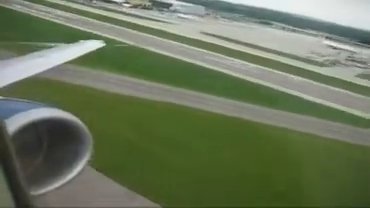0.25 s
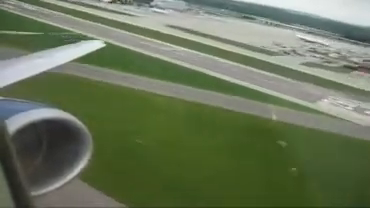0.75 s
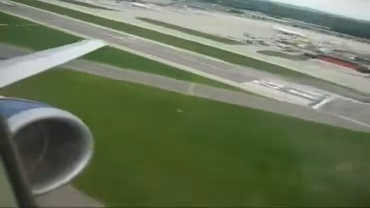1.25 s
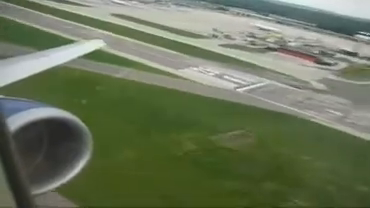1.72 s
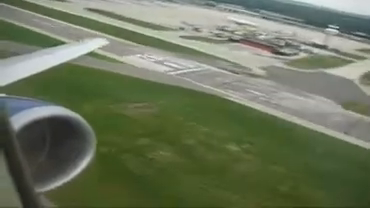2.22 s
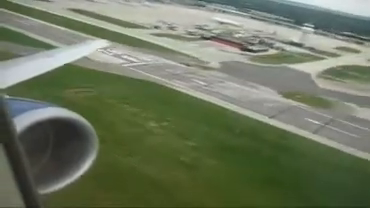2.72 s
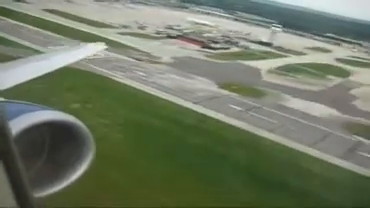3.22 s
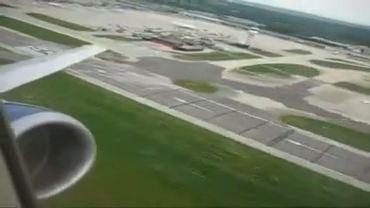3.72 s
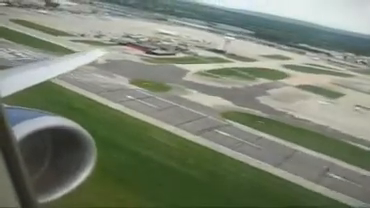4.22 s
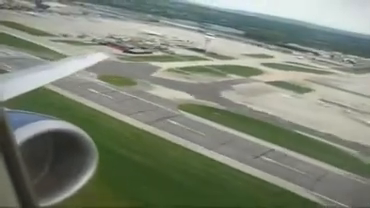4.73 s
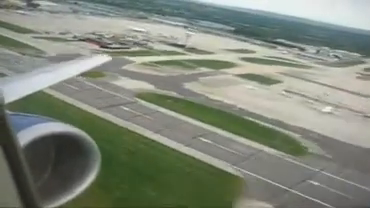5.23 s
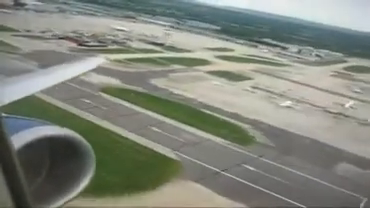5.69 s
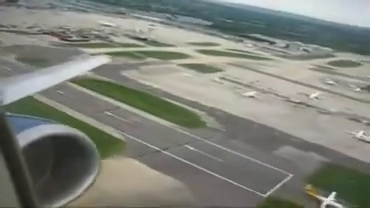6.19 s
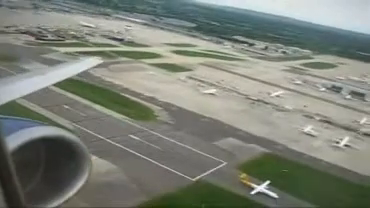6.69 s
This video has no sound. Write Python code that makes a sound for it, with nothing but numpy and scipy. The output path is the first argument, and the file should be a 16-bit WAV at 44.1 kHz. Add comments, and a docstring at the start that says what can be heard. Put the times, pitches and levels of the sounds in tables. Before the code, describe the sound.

From the first moment to the end at about 7 seconds, a jet engine runs at takeoff power, heard inside an airliner cabin through one microphone at the window. A deep exhaust roar is the loudest part, with an uneven boom and rumble from the cabin walls beneath it. Over this, the nearby fan makes a raspy buzz-saw drone that holds its pitch while its overtones slowly swell and fade, one middle tone standing out most around 4.5 seconds. A very faint, thin, high whine stays behind it. Air rushes along the outside of the cabin, with a light hiss that grows slightly. Small gusts lift the buzz, roar and rush together at about 0.7, 2.7, 3.3 and 4.8 seconds and again at the very end. The overall level stays nearly even, and the treble is slightly gritty.

```python
"""Airliner cabin, window seat just ahead of the engine, climbing out at takeoff power.
Close by, the fan's supersonic blade tips give a buzz-saw chord on multiples of the shaft speed, over
a thin core whine. The jet exhaust makes the cabin boom and roar; air rushes along the skin outside.
One microphone at the window, on a pocket camera whose coarse sampling mirrors the buzz into the treble."""
import sys
import numpy as np
from scipy import signal
from scipy.fft import rfft, irfft, next_fast_len
from scipy.io import wavfile
from scipy.ndimage import uniform_filter1d

SR = 44100
rng = np.random.default_rng(int(sys.argv[2]) if len(sys.argv) > 2 else 0)


def store_pcm(level_fs):
    """Save levels as 16-bit WAV."""
    pcm = np.round(np.clip(level_fs, -1, 1) * 32767).astype(np.int16)
    wavfile.write(sys.argv[1], SR, np.atleast_2d(pcm).T)


N = 306495

# gusts in the air that meets the aircraft: t/s, strength/dB
GUST_STRENGTH = [(0.0, -1.0), (0.2, -2.5), (0.7, 2), (1.6, 0), (1.8, 0), (2.0, -2.5), (2.65, 2.5), (3.0, 1),
                 (3.3, 3), (3.6, -1.5), (3.9, 0.5), (4.45, -1.5), (4.8, 4), (5.0, -1.0), (6.45, 0.5),
                 (6.95, 4.5)]
# share of a gust that each named sound takes up: dB per dB
GUST_RESPONSE = {"buzz": 0.48, "roar": .4, "rush": 0.73, "hiss": .25}
# buzz-saw tones of the fan: shaft multiple, relative level/dB
BUZZ_TONES = [(3, -35), (4, -38), (5, -42), (8, -59), (11, -52), (12, -56), (13, -61), (14, -61), (15, -55),
              (16, -62), (18, -62), (19, -59), (20, -68), (21, -66), (22, -67), (23, -57), (24, -65),
              (25, -57), (26, -65), (27, -64), (29, -68), (30, -71), (31, -75), (32, -66), (33, -71),
              (34, -60), (35, -61), (36, -59), (37, -59), (39, -60), (40, -56), (41, -65), (42, -67),
              (44, -72), (45, -72), (46, -65), (47, -64), (48, -61), (49, -64), (50, -69), (51, -72),
              (55, -68), (56, -71)]
# fan tones that swell and fade as their lobes sweep past the seat: shaft multiple
LOBE_ORDERS = (6, 10, 17, 28, 38, 43)
# for each of these: mean level/dB, swing/dB, loudest at t/s, period/s, gust share in dB per dB
LOBE_SWINGS = [(-44.5, 7.5, 4.53, 10, 1.0), (-45.5, 2, 0.3, 10, 0.6), (-49.3, 1.1, 7.9, 13, 0.7),
               (-61, 3, 4.9, 11, 1.5), (-55, 3.5, 3.0, 8, .5), (-54.5, 3.5, 0.47, 6.9, 0.84)]
# whine of the engine core: f/Hz, level/dB
CORE_TONES = [(2329, -70.5), (2371, -67.5), (4644, -64), (4703, -71.5)]
# cabin air, walls, jet and window panel, heard from the seat: f/Hz, relative spectral level/dB
BOOM_SPECTRUM = [(10, -33.5), (18, -21), (24, -10), (40, -17), (49, 1), (54, -2), (61, -4.5), (72, -15.5),
                 (100, -28.5)]
RUMBLE_SPECTRUM = [(55, -26.5), (76, -1.5), (92, -0.5), (116, -1), (135, -6), (190, -28.5)]
ROAR_SPECTRUM = [(105, -20.5), (145, -2), (168, 1.5), (200, 2), (255, -5), (295, -9), (360, -19.5),
                 (460, -23), (650, -44.5)]
PANEL_SPECTRUM = [(240, -24.5), (295, -2), (322, -2), (355, -6), (400, -12), (480, -25.5)]
# rise and fall of cabin boom, wall rumble and panel drone: t/s, relative level/dB
BOOM_ENVELOPE = [(0.0, -18.5), (0.25, -25), (0.45, -21), (1.9, -19), (2.2, -21.5), (3.0, -20.0),
                 (3.25, -21.5), (3.45, -18.5), (4.35, -20), (4.65, -26), (4.85, -16.5), (5.05, -18),
                 (5.35, -21.5), (5.55, -18), (6.1, -25), (6.3, -20.5), (6.75, -19.5), (6.95, -17)]
RUMBLE_ENVELOPE = [(0.0, -22), (0.25, -27), (0.6, -20.0), (1.6, -24), (1.85, -19.5), (2.2, -24.5),
                   (2.75, -17.5), (3.1, -27.5), (3.35, -19), (3.6, -26.5), (4.35, -20), (4.55, -23.5),
                   (5.65, -22.5), (5.9, -27.5), (6.45, -19.5), (6.95, -22)]
PANEL_ENVELOPE = [(0, -29.5), (1, -28), (1.7, -31.5), (2.9, -30), (4, -31.5), (5.3, -33), (5.9, -32.5),
                  (6.35, -28.5), (6.95, -29.5)]
# air along the skin and at the window: f/Hz, relative spectral level/dB
RUSH_SPECTRUM = [(300, -14), (450, 2), (560, -1.5), (680, -8), (790, -4.5), (910, -9), (1150, -12.5),
                 (1350, -13.5), (1550, -17), (2000, -17.5), (2450, -22), (3000, -18), (3700, -22),
                 (5400, -44.5)]
HISS_SPECTRUM = [(800, -10), (2000, -0.5), (3500, 0), (4300, 1.5), (5600, 0)]


def undb(db):
    """Decibels to gain."""
    return 10 ** (np.asarray(db) / 20)


def curve(table):
    """Rows of t/s and a value, joined by straight lines."""
    return np.interp(np.arange(N) / SR, *np.transpose(table))


def wander(rate_hz):
    """Smooth random drift of spread 1 that changes about rate_hz times a second."""
    points, control_hz = 2048, 200
    hz = np.fft.rfftfreq(points, 1 / control_hz)
    drift = irfft(rfft(rng.standard_normal(points)) * np.exp(-.5 * (hz / rate_hz) ** 2))
    return np.interp(np.arange(N) / SR * control_hz, np.arange(points), drift / drift.std())


def tone(turns, scatter, fade_hz):
    """A tone of rms about 1: a steady direct part plus a part scattered by turbulent air."""
    angle = 2 * np.pi * (turns + rng.random())
    in_phase = (1 + scatter * wander(fade_hz)) * np.sin(angle)
    quadrature = scatter * wander(fade_hz) * np.cos(angle)
    return (in_phase + quadrature) / np.sqrt(.5 + scatter ** 2)


def fan(t, gust_db):
    """Each blade drags a slightly different shock wave; the pattern repeats once a turn and buzzes."""
    shaft_hz = 79.1 + .04 * wander(.7)
    turns = np.cumsum(shaft_hz) / SR
    turns += .0005 * wander(12)  # uneven inflow shakes the shocks, blurring high multiples most
    flutter_db = .78 * wander(11)
    rasp_db = GUST_RESPONSE["buzz"] * gust_db + flutter_db
    buzz = lobes = 0
    for order, db in BUZZ_TONES:
        inflow_share = min(order / 22, 1)  # short waves feel the inflow fully, long ones hardly
        buzz += undb(db + inflow_share * rasp_db) * tone(order * turns, scatter=.32, fade_hz=2.4)
    for order, (mean_db, swing_db, loudest_s, period_s, gust_share) in zip(LOBE_ORDERS, LOBE_SWINGS):
        sweep_db = swing_db * np.cos(2 * np.pi * (t - loudest_s) / period_s)
        level_db = mean_db + sweep_db + gust_share * gust_db + flutter_db
        lobes += undb(level_db) * tone(order * turns, scatter=.18, fade_hz=2.9)
    return undb(-.36) * buzz + lobes


def core_whine(t):
    """The fast inner spools whine faintly at their own steady pitches."""
    return sum(undb(db) * tone(hz * t, scatter=.63, fade_hz=1.9) for hz, db in CORE_TONES)


def turbulence(spectrum, even_s):
    """Noise of the given colour whose power, taken over even_s seconds, stays near 1."""
    size = next_fast_len(N)
    hz, db = np.transpose(spectrum)
    log_hz = np.log(np.fft.rfftfreq(size, 1 / SR) + 1e-9)
    gain = undb(np.interp(log_hz, np.log(hz), db, left=-np.inf, right=-np.inf))
    noise = irfft(rfft(rng.standard_normal(size)) * gain, size)[:N]
    return noise / np.sqrt(uniform_filter1d(noise ** 2, int(even_s * SR)))


def airframe(t, gust_db):
    """The exhaust shakes the fuselage: cabin air booms, walls rumble and roar, the window panel drones."""
    boom = undb(curve(BOOM_ENVELOPE) + .4) * turbulence(BOOM_SPECTRUM, even_s=.25)
    rumble = undb(curve(RUMBLE_ENVELOPE) + .36) * turbulence(RUMBLE_SPECTRUM, even_s=.2)
    roar_db = -22 - .08 * t + GUST_RESPONSE["roar"] * gust_db  # the exhaust falls behind as speed builds
    roar = undb(roar_db) * turbulence(ROAR_SPECTRUM, even_s=.29)
    panel = undb(curve(PANEL_ENVELOPE) - .6) * turbulence(PANEL_SPECTRUM, even_s=.38)
    return boom + rumble + roar + panel


def airflow(t, gust_db):
    """The boundary layer rushes along the skin and hisses at the window, louder as speed builds."""
    rush_db = -38.5 + .06 * t + GUST_RESPONSE["rush"] * gust_db
    rush = undb(rush_db) * turbulence(RUSH_SPECTRUM, even_s=.13)
    hiss_db = -50.5 + .23 * t + GUST_RESPONSE["hiss"] * gust_db + .31 * wander(9)
    hiss = undb(hiss_db) * turbulence(HISS_SPECTRUM, even_s=.55)
    return rush + hiss


def scene():
    """One microphone at the window takes it all in; the same gusts work on fan, fuselage and skin."""
    t = np.arange(N) / SR
    gust_db = curve(GUST_STRENGTH)
    return (fan(t, gust_db) + core_whine(t) + airframe(t, gust_db) + airflow(t, gust_db))[None]


def record(dry):
    """The camera keeps the band below half its rate and holds each sample, mirroring that band upwards."""
    hold_samples, top_hz = 4, 7680
    size = next_fast_len(N)
    below_half_rate = np.fft.rfftfreq(size) < .5 / hold_samples
    band = irfft(rfft(dry, size) * below_half_rate, size)
    held = np.repeat(band[:, ::hold_samples], hold_samples, axis=1)[:, :N]
    steep_lowpass = signal.ellip(14, .2, 80, top_hz, fs=SR, output="sos")
    return signal.sosfilt(steep_lowpass, held)


dry = scene()
out = record(dry)
store_pcm(out)
```